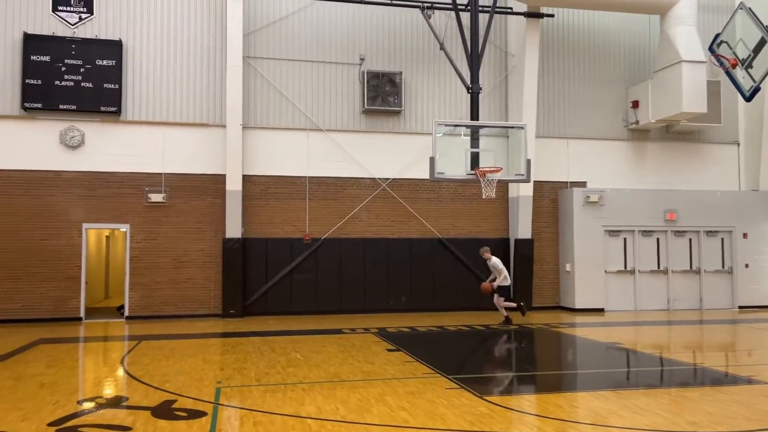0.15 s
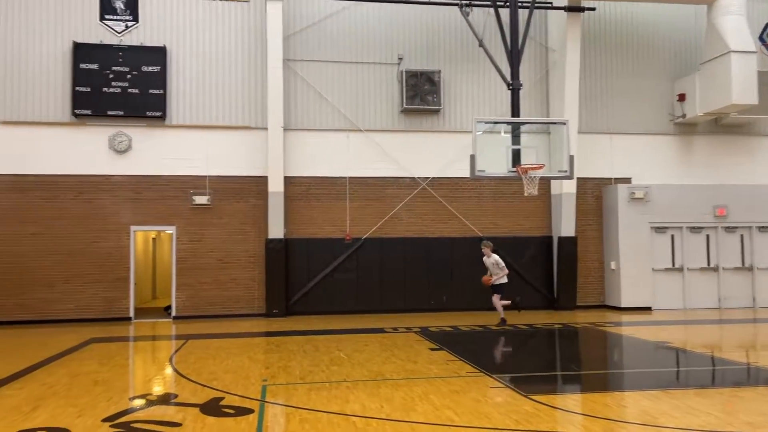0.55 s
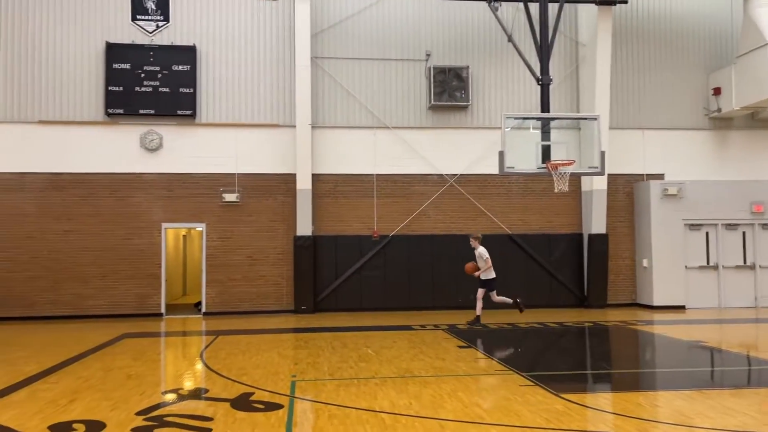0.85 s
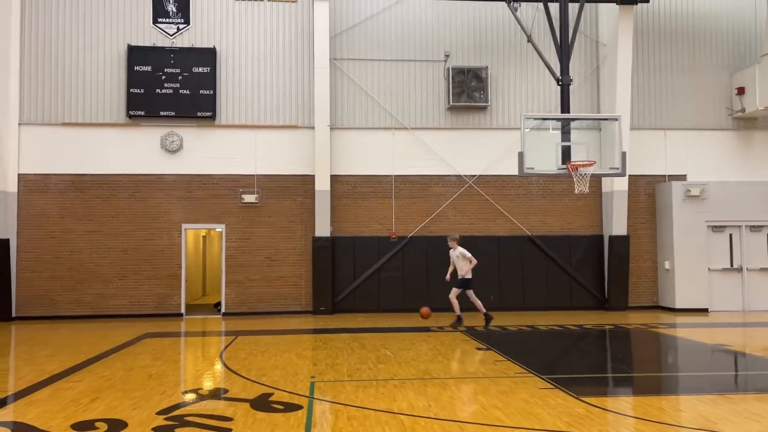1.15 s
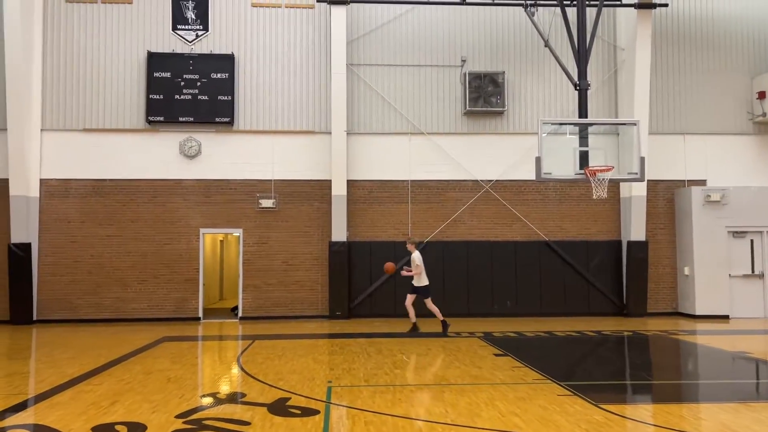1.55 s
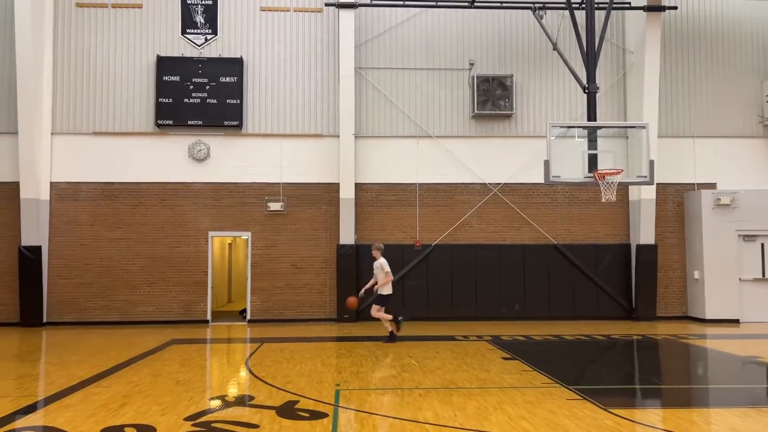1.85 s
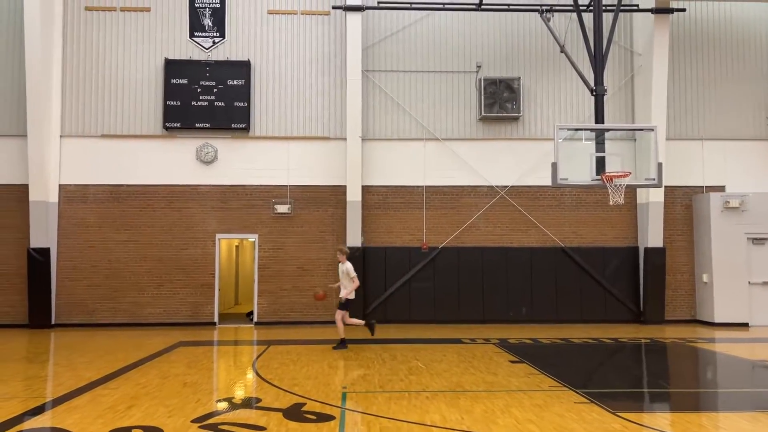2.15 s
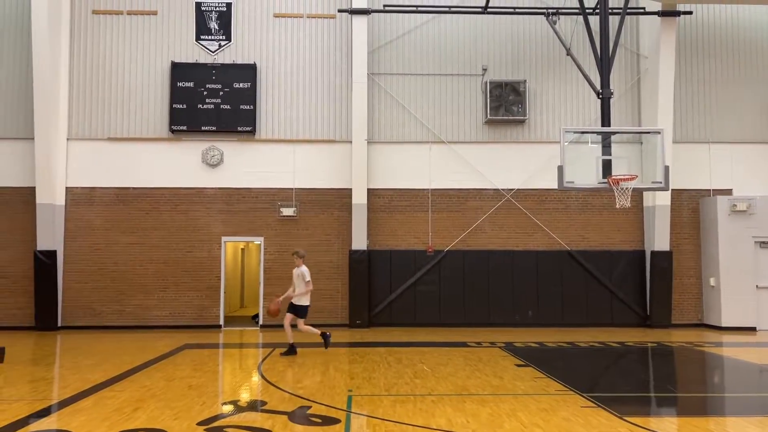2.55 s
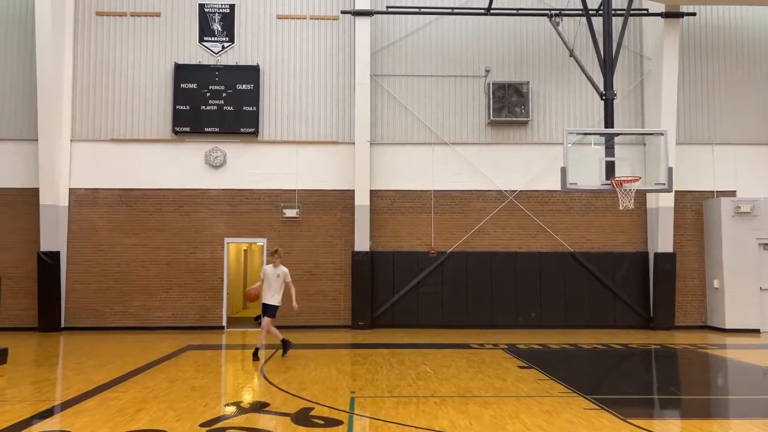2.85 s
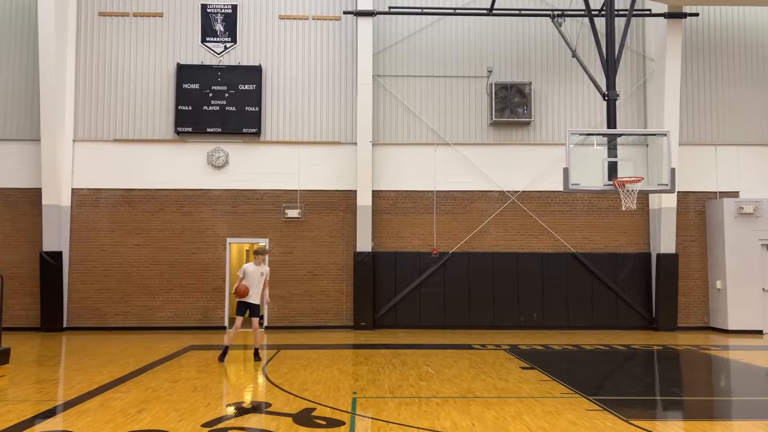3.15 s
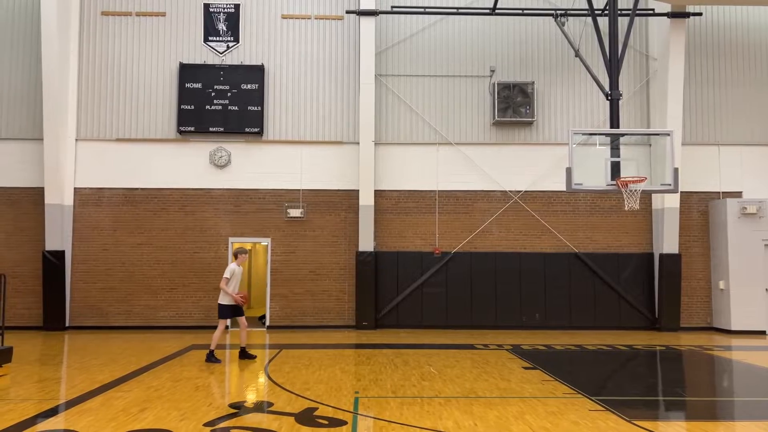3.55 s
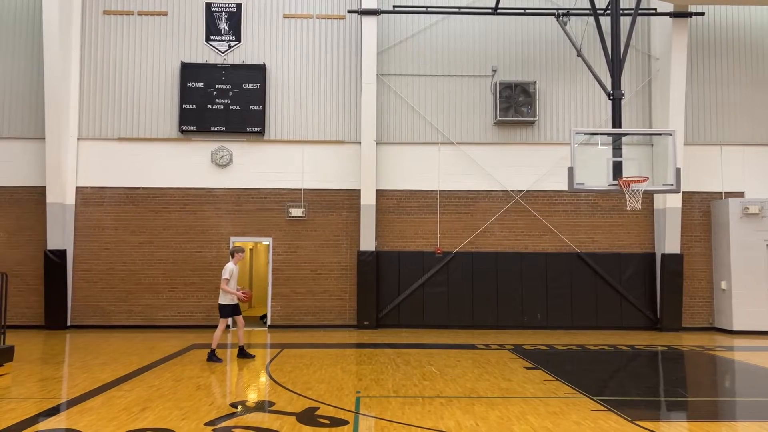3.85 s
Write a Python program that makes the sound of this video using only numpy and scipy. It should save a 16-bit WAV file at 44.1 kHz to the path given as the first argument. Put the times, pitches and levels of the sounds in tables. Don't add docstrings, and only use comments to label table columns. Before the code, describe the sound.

Distant dribbling: four hard, booming ball bounces with faint palm taps, ringing through a large reverberant gym over low ventilation rumble.

```python
import sys
import numpy as np
from scipy import signal
from scipy.fft import rfft, irfft
from scipy.io import wavfile
from scipy.ndimage import uniform_filter1d

SR = 44100
rng = np.random.default_rng(int(sys.argv[2]) if len(sys.argv) > 2 else 0)


def generate_wav(sig):
    pcm = np.round(np.clip(np.atleast_2d(sig).T, -1, 1) * 32767).astype(np.int16)
    wavfile.write(sys.argv[1], SR, pcm)


def amplitude_ratio(level_db):
    exponent = np.asarray(level_db, float) / 20
    return 10 ** exponent


N = 176832
HZ = np.fft.rfftfreq(N, 1 / SR)
FLOOR_PAN_DB = np.array([[.8], [-.8]])


def evened(x):
    return x / np.sqrt(np.mean(x ** 2) + 1e-20)


def peaked(x):
    return x / (abs(x).max() + 1e-12)


def read(points, hz):
    f, value = np.transpose(points)
    return np.interp(np.log(hz + 1), np.log(f + 1), value)


def add(mix, start_s, sound):
    part = mix[..., round(start_s * SR):][..., :sound.shape[-1]]
    part += sound[..., :part.shape[-1]]


def ring(modes, t, detune):
    t = np.maximum(t, 0)
    total = 0
    for (hz, db, t60), factor in zip(modes, detune):
        total = total + amplitude_ratio(db - 60 * t / t60) * np.sin(2 * np.pi * hz * factor * t)
    return total


def random_swell(count, size):
    noise = rng.standard_normal(count)
    return evened(uniform_filter1d(uniform_filter1d(noise, size=size), size=size))


def slap_sound(late, slap_hz, grit, direct):
    u = late / .00007
    pulse = -(1 - u ** 2) * np.exp(-u ** 2 / 2)
    band = signal.iirpeak(slap_hz, 1.05, SR)
    if not direct:
        smear = grit * np.exp(-(late / .0007) ** 2)
        return peaked(signal.lfilter(*band, signal.lfilter(*band, smear)))
    t = np.arange(len(grit)) / SR
    scatter = signal.lfilter([1, -1], [1, -.7], grit) * amplitude_ratio(-19 - 60 * t / .035)
    return 0.43 * pulse + 0.9 * peaked(signal.lfilter(*band, pulse)) + scatter


# pitch_hz, level_db, t60_s (time to fade by 60 dB)
PORT = [(9180, 5, 0.0033), (11790, 1.5, 0.0056)]


def port_fizz(t, luck):
    return peaked(ring(PORT, t, 1 + 0.073 * luck) * np.clip(t / 0.00059, 0, 1))


# pitch_hz, level_db, t60_s
BALL = [(1230, 9, .014), (738, -1, 0.024), (1744, -2.5, 0.038), (3380, -19.5, 0.033), (4430, -54.5, 0.0017),
        (6500, -1, 0.0052)]


def ball_knock(late, luck, direct):
    spread = .03 if direct else .12
    return peaked(-ring(BALL, late + 0.000227, 1 + spread * luck))


def arrival(slap_db, fizz_db, knock_db, pan_db, slap_hz, chance, direct):
    luck, grit = chance[:8], chance[8:]
    t = np.arange(len(grit)) / SR
    late = t - .0006
    sound = amplitude_ratio(slap_db + 1.0) * slap_sound(late, slap_hz, grit, direct)
    sound = sound + amplitude_ratio(fizz_db + 8.5) * port_fizz(t, luck[:2])
    sound = sound + amplitude_ratio(knock_db + 10) * ball_knock(late, luck[2:], direct)
    return sound * amplitude_ratio(np.clip(pan_db, -6, 7) * np.array([[.5], [-.5]]))


def palm_thud():
    modes = [(720, 2, .018), (1150, -2, .008)]  # pitch_hz, level_db, t60_s
    return ring(modes, np.arange(900) / SR, [1, 1])


# pitch_hz, level_db, t60_s
BOARDS = [(289, -8.5, 0.027), (386, -26, 0.096)]


def boom(first):
    t = np.arange(2600) / SR
    turns = 26.4 * np.sqrt(t) - 1.28
    onset, swell_s = (1.3, .0175) if first else (2.5, .0115)
    envelope = (t / swell_s) ** onset * np.exp(-(t / swell_s) ** 2)
    wave = peaked(envelope * np.cos(2 * np.pi * turns))
    return wave + first * ring(BOARDS, t - .002, [1, 1])


# start_s, slap_db, knock_db, boom_db, left_over_right_db
CONTACTS = [
    (.0339, -20, -22, -14, 1),
    (.9511, -48, -46, -45, 5),
    (1.1759, -15.5, -24, -14, .5),
    (1.7522, -33.5, -41, -33, 1.5),
    (2.0265, -13.5, -17, -11, 4),
    (2.5455, -31, -38, -29, 4),
    (2.7127, -14, -21, -9, 6.1),
]


def add_contacts(mix, chances):
    fizz_per_slap = 1.36
    palm_below_db = -25
    boom_lag_s = .0007
    for (s, slap_db, knock_db, boom_db, pan_db), chance in zip(CONTACTS, chances):
        fizz_db = -5.5 + fizz_per_slap * slap_db
        add(mix, s, arrival(slap_db, fizz_db, knock_db, pan_db, 2870, chance, True))
        if slap_db < palm_below_db:
            add(mix, s + boom_lag_s, amplitude_ratio(slap_db + FLOOR_PAN_DB) * palm_thud())
        add(mix, s + boom_lag_s, boom(True) * amplitude_ratio(boom_db + FLOOR_PAN_DB))


def source_of(s):
    return [row for row in CONTACTS if row[0] < s][-1]


RETURNS = [.072, .105, .175, .269, 1.207, 1.239, 1.282, 1.331, 2.067, 2.087, 2.123, 2.137, 2.194, 2.249,
           2.7535, 2.811, 2.869, 2.929]


def add_floor_returns(mix):
    for s in RETURNS:
        start_s, _, _, boom_db, _ = source_of(s)
        level_db = boom_db - 1.65 - 66 * (s - start_s)
        add(mix, s, boom(False) * amplitude_ratio(level_db + FLOOR_PAN_DB))


# start_s, crisp_db, knock_db, left_over_right_db
FRONT_ECHOES = [(.0535, -32.5, -25.5, -4), (1.1904, -36, -31, 7), (1.2238, -31.5, -30.5, 5),
                (2.0363, -34, -32, -1), (2.0414, -28.5, -48, 7), (2.0488, -22, -44, -4),
                (2.0524, -33, -47, 7), (2.1124, -33.5, -43, 0), (2.7148, -48, -25, 5),
                (2.7204, -29, -26, 7), (2.7254, -30.5, -27.5, 2), (2.7427, -31, -24, 5),
                (2.7742, -29, -52.5, -4)]
# start_s, crisp_db, knock_db, left_over_right_db
SIDE_ECHOES = [(0.045, -44, -38, -4), (.0624, -35, -35, -1), (.071, -16, -37, 4.5), (0.0798, -31, -35, -3),
               (1.1954, -23.5, -28, 2), (1.2051, -30, -31, 0), (1.234, -31, -45, 3), (2.0827, -26, -45, 0),
               (2.0964, -25.5, -50, 7), (2.7398, -45, -28, 4), (2.753, -31, -30, 9), (2.7876, -27, -50, 8)]


def add_echoes(mix, echoes, chances):
    for (s, crisp_db, knock_db, pan_db, slap_db, fizz_db), chance in zip(echoes, chances):
        slap_hz = 2700 + 28000 * (s - source_of(s)[0])
        add(mix, s, arrival(crisp_db + slap_db, crisp_db + fizz_db, knock_db, pan_db, slap_hz, chance, False))


# pitch_hz, likeness (0 to 1)
SAME = [(60, .995), (130, .985), (280, .88), (590, .5), (1270, .15), (2700, .45), (5800, .45), (8000, .7),
        (10000, .97), (12500, .8)]
# pitch_hz, level_db
LOUDER_LEFT = [(60, 1.5), (200, 1.8), (640, 2.8), (4000, 3), (7000, 2.5), (9500, 0)]


def diffuse(colour_db):
    a, b = rfft(rng.standard_normal((2, N)))
    same = np.clip(read(SAME, HZ), 0, 1)
    tilt = amplitude_ratio(read(LOUDER_LEFT, HZ) / 2)
    left = a * tilt
    right = (same * a + np.sqrt(1 - same ** 2) * b) / tilt
    return rfft(evened(irfft(np.array([left, right]) * amplitude_ratio(colour_db), N)))


# start_s, tail_db, body_db, brightness_db, lingering_ball_tones_db
BLOWS = [
    (-.45, -23.5, 0, -10, -64),
    (0.035, -26.5, 3.5, -2, -44),
    (.948, -54.5, 9, 10, -68),
    (1.1726, -29, 10, 2.5, -61),
    (1.752, -46, 9, 6, -57),
    (2.0275, -25.5, 6.5, 2.5, -37),
    (2.5463, -43.5, 12.5, -0.5, -52),
    (2.713, -25, 6, 2.5, -40.5),
]
# pitch_hz, rise_s
HALL_RISE = [(60, 0.016), (200, 0.015), (600, 0.0063), (2000, 0.0017), (8000, 0.01)]
# pitch_hz, t60_s
HALL_T60 = [(60, 1.9), (110, 1.54), (200, 1.25), (420, 0.92), (1100, 3.2), (2900, 1.96), (5500, 1.28),
            (9000, 0.63), (12000, 0.4)]


def build_up(t, hz, gains_db):
    gap_s = 0.0085
    since = np.maximum(t - np.array(BLOWS)[:, :1] - gap_s, 0)
    grown = 1 - np.exp(-since / read(HALL_RISE, hz))
    level = grown * amplitude_ratio(gains_db[:, None] - 60 * since / read(HALL_T60, hz))
    return np.interp(np.arange(N) / SR, t, np.sqrt((level ** 2).sum(0)))


# pitch_hz, level_db (per Hz)
HALL = [(24, -50), (40, -15), (91, 0), (137, -3.5), (193, -20), (352, -22.5), (600, -29.5), (728, -30.5),
        (862, -29), (1780, -23), (2620, -32), (8570, -41.5), (10200, -41), (11200, -38), (12900, -71),
        (16800, -112), (22000, -120)]
# pitch_hz, width_hz, level_db
HOLLOW = [(740, 24, 1), (1190, 40, -1), (1370, 30, -3), (1770, 30, -9)]


def hall(count=20, grain_db=1.0):
    ripple = random_swell(len(HZ), 120)
    z = diffuse(read(HALL, HZ) + 1.9 * ripple * (HZ > 400))
    _, tail_db, body_db, bright_db, hollow_db = np.transpose(BLOWS)
    centres = np.geomspace(40, 14000, count)
    place = np.interp(np.log(HZ + 1), np.log(centres), np.arange(count))
    t = np.arange(0, N + 32, 32) / SR
    out = np.zeros((2, N))
    bunches = random_swell(N, 150)
    for k, f in enumerate(centres):
        bass = 1 / (1 + (f / 200) ** 4)
        treble = 1 / (1 + (5000 / f) ** 4)
        presence = np.exp(-(np.log(f / 3000) / .3) ** 2)
        body = np.exp(-(np.log(f / 370) / 1.21) ** 2)
        gains_db = tail_db + 3 * bass
        gains_db = gains_db + (body + 0.45 * presence) * body_db
        gains_db = gains_db + (treble + 0.067 * presence) * bright_db
        band = irfft(z * np.clip(1 - abs(place - k), 0, 1), N)
        out += band * build_up(t, f, gains_db) * amplitude_ratio(grain_db * (1 - bass) * bunches)
    peaks = sum(amplitude_ratio(db) / (1 + ((HZ - f) / (width / 2)) ** 2) for f, width, db in HOLLOW)
    tones = irfft(diffuse(20 * np.log10(peaks)), N)
    return out + tones * build_up(t, 690, hollow_db)


# pitch_hz, level_db (per Hz)
AIR = [(15, -64), (28, -10), (41, -30), (55, 2.5), (70, -3.5), (123, -14.5), (180, -19.5), (333, -25),
       (853, -33), (1500, -36), (3600, -48.5), (7000, -58), (11500, -58), (12300, -97)]


def ventilation(top_hz=10300, waver_db=5):
    z = diffuse(read(AIR, HZ))
    top = irfft(z * (HZ > top_hz), N)
    slow = random_swell(N, 3000)
    waver = amplitude_ratio(waver_db * np.minimum(slow, .5)) - 1
    return amplitude_ratio(-35) * (irfft(z, N) + top * waver)


def scene():
    mix = hall() + ventilation()
    echoes = [row + (2, -2) for row in FRONT_ECHOES] + [row + (-2, -17) for row in SIDE_ECHOES]
    chances = rng.standard_normal((len(CONTACTS) + len(echoes), 1408))
    add_contacts(mix, chances)
    add_echoes(mix, echoes, chances[len(CONTACTS):])
    add_floor_returns(mix)
    return mix


def low_pass(x):
    return signal.sosfilt(signal.butter(12, 16200, fs=SR, output="sos"), x)


# pitch_hz, level_db
MIC = [(5500, 0), (7200, 0.5), (8800, 4.5), (10200, 10), (11200, 3.5), (12300, -11), (13200, -17),
       (16000, -28)]
# pitch_hz, lag_radians
LEFT_LAG = [(100, -.014), (1000, -.14), (2500, -.35), (5000, -.6), (8500, 0), (9600, 2.9), (10500, 3.4),
            (11400, 6.), (13000, 6.3)]


def record(dry):
    lag = np.array([read(LEFT_LAG, HZ), 0 * HZ])
    heard = irfft(rfft(dry) * amplitude_ratio(read(MIC, HZ)) * np.exp(-1j * lag), N)
    return low_pass(heard)


dry = scene()
out = record(dry)
generate_wav(out)
```